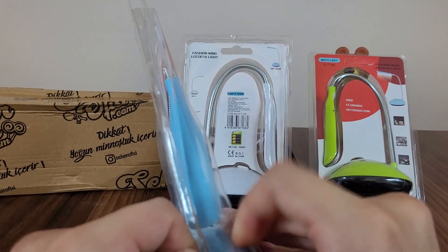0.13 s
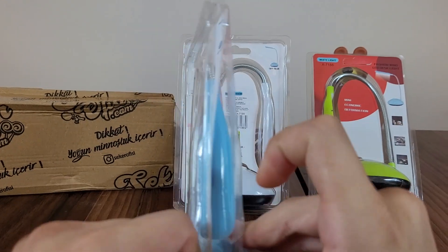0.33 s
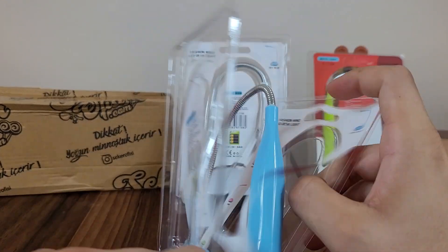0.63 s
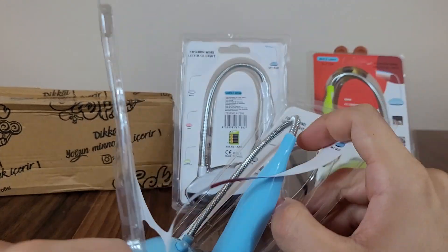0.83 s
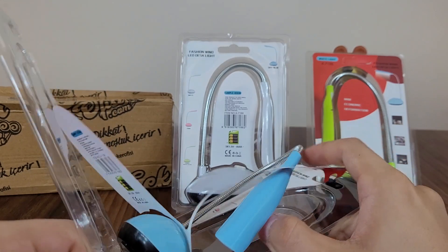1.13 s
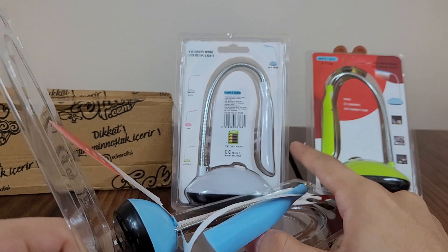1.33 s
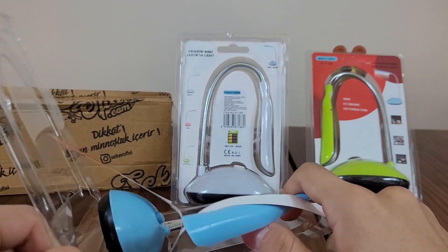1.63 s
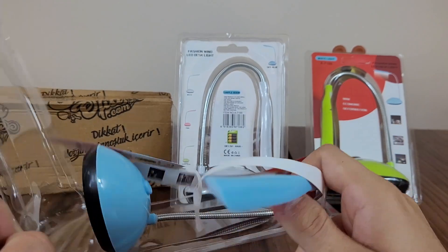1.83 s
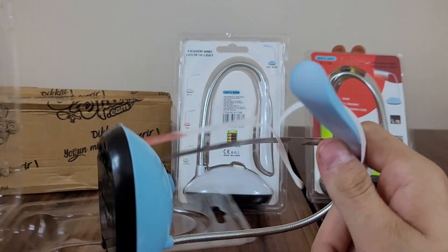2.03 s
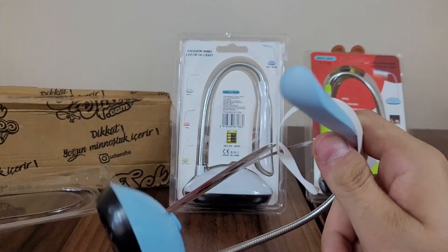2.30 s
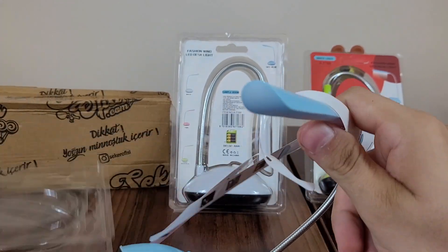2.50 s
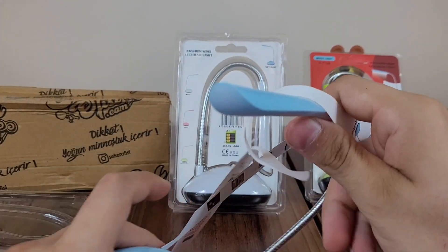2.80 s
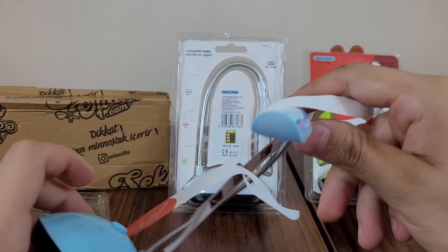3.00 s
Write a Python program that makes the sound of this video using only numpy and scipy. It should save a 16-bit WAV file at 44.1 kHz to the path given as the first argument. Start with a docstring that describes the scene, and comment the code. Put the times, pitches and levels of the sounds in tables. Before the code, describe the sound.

Stiff clear plastic packaging snaps, crackles and rasps as hands pull a lamp out of it

```python
"""Lamp and blister pack

Hands pull a desk lamp out of a stiff clear blister pack, close by in a small room.
The plastic shell snaps as it buckles: sharp fronts, pitched pings and short noise rings.
It rasps and groans in stick-slip where the lamp slides along it, and crinkles under the fingers.
Lamp and pack bump on the wooden table as sums of damped modes; the room answers over a faint floor."""
import sys
import numpy as np
from scipy import signal
from scipy.fft import rfft, irfft, next_fast_len
from scipy.io import wavfile
from scipy.ndimage import uniform_filter1d, map_coordinates

SR = 44100
rng = np.random.default_rng(int(sys.argv[2]) if len(sys.argv) > 2 else 0)


def int16_out(signal):
    """Quantize to a 16-bit WAV file."""
    q = np.round(np.clip(np.atleast_2d(signal).T, -1, 1) * 32767)
    wavfile.write(sys.argv[1], SR, q.astype(np.int16))


N = 138915


def amp(db):
    """Decibel law: level to amplitude ratio."""
    return 10 ** (np.asarray(db) / 20)


def unit(x):
    """Normalisation to an rms of 1."""
    return x / np.sqrt(np.mean(x ** 2) + 1e-20)


def along(points, hz):
    """Interpolation of (f/Hz, value) points on a logarithmic frequency axis."""
    f, v = np.transpose(points)
    return np.interp(np.log(hz + 1), np.log(f + 1), v)


def add(track, s, x):
    """Superposition: mix x into the track from time s."""
    i = max(0, round(s * SR))
    track[:, i:i + x.shape[-1]] += x[..., :max(0, N - i)]


def filtered(x, response):
    """Linear filtering: the spectrum of x times a complex response of frequency."""
    size = 2 * next_fast_len(x.shape[-1] // 2 + 4096)  # even, with room for the tail
    spectrum = rfft(x, size) * response(np.fft.rfftfreq(size, 1 / SR))
    return irfft(spectrum, size)[..., :x.shape[-1]]


def coloured(x, points, tilt=0):
    """Minimum-phase filtering to a (f/Hz, level/dB) shape, tilted in dB per octave about 2.5 kHz."""
    def response(hz):
        octaves = np.log2(np.maximum(hz, 800) / 2500)  # no further tilt below 800 Hz
        cepstrum = irfft(np.log(amp(along(points, hz) + tilt * octaves)))
        # folding the cepstrum onto positive time makes the filter causal
        half = len(cepstrum) // 2
        cepstrum[1:half] *= 2
        cepstrum[half + 1:] = 0
        return np.exp(rfft(cepstrum))
    return filtered(x, response)


# Coherence of the two channels: f/Hz, left-right correlation
LIKENESS = [(60, 0.72), (350, 0.9), (900, 0.31), (2000, 0.062), (6000, 0.033)]


def noise(size):
    """Partial coherence: white stereo noise, alike in the bass and nearly unrelated in the treble."""
    def mid_and_side(hz):
        angle = np.arccos(np.clip(along(LIKENESS, hz), -1, 1)) / 2
        return np.array([np.cos(angle), np.sin(angle)])
    mid, side = filtered(rng.standard_normal((2, size)), mid_and_side)
    return np.array([mid + side, mid - side])


def burst(t60, size=70):
    """Modal overlap: decaying stereo noise of energy 1, of many close modes but an even spectrum."""
    t = np.arange(SR // 10) / SR
    x, decay = noise(len(t)), amp(-60 * t / t60)
    power = uniform_filter1d(np.abs(rfft(x * decay)) ** 2, size)  # smoothed over bins
    evened = irfft(rfft(x) / np.sqrt(np.abs(power)), len(t))
    return unit(evened * decay) / np.sqrt(len(t))


def shell(x, lowest_hz=400):
    """Radiation efficiency: a thin shell radiates little bass."""
    return filtered(x, lambda f: .8 * (1j * f / (lowest_hz + 1j * f)) ** 2)


CLUMPS_PER_S, CLUMP_DB = 170, 2.5  # pace and spread of the clumping
SLIP_SPREAD_DB = 2  # spread of slip sizes in rasps and finger ticks


def slips(rate, spread_db):
    """Stick-slip: a train of tiny uneven clicks that come in clumps, rms 1."""
    place = np.arange(N) * CLUMPS_PER_S / SR
    clump_db = CLUMP_DB * map_coordinates(rng.standard_normal(N // 20), [place], order=1)
    slipping = rng.random(N) < rate / SR
    spread = spread_db * np.clip(rng.standard_normal(N), -2, 2)
    sizes = slipping * amp(clump_db + spread)
    # each slip's energy dies with a time constant of 1.1 ms
    energy = signal.lfilter([1], [1, -np.exp(-1 / (0.0011 * SR))], sizes ** 2)
    return unit(noise(N) * np.sqrt(energy))


# Spectrum of the background: f/Hz, relative level/dB
FLOOR_SPECTRUM = [(20, -14.5), (65, -5.5), (200, -15), (400, -4.5), (600, -37), (1200, -16), (16000, -29.5)]
FLOOR_DB = -68  # rms level


def background():
    """Stationary random noise: a faint, steady floor."""
    return amp(FLOOR_DB) * unit(coloured(noise(N), FLOOR_SPECTRUM))


# Reverberation time of the room: f/Hz, t60/s
ROOM_DECAY = [(100, 0.59), (300, 0.42), (700, 0.37), (2000, 0.33), (5000, 0.28), (13000, 0.083)]
# Spectrum of the reverberation: f/Hz, level/dB
ROOM_SPECTRUM = [(60, -11), (200, -7.5), (330, -4), (600, -8.5), (1100, -9.5), (2600, -6.5), (6000, -17.5),
                 (14000, -13.5)]


def room(x, delay_s=.009, count=12):
    """Diffuse reverberation: noise tails with exponential decay, crossfaded as the pack is moved about."""
    out, place = np.zeros((2, N)), np.linspace(0, count - 1, N)
    for k in range(count):
        hz, t, cells = signal.stft(noise(SR * 2 // 3), SR, nperseg=256)
        t60 = along(ROOM_DECAY, hz)[:, None]
        even_energy = np.sqrt(2 * np.log(1000) / (t60 * SR))  # whatever the decay time
        tail = signal.istft(cells * amp(-60 * t / t60) * even_energy, SR, nperseg=256)[1]
        near = np.abs(place - k) < 1
        part = x[:, near] * np.cos(np.pi / 2 * (place[near] - k))
        answer = signal.fftconvolve(part, coloured(tail, ROOM_SPECTRUM), axes=1)
        add(out, np.argmax(near) / SR + delay_s, answer)
    return out


# Grip of the fingers: t/s, crinkle relative level/dB, low rubbing relative level/dB
FINGER_GRIP = [(0, -40, -44.5), (.14, -48.5, -39), (.29, -51.5, -46.5), (.41, -76, -52.5), (.45, -42, -45),
               (0.539, -43, -47), (.85, -56, -53.5), (1.0, -50, -58.5), (1.111, -55, -93), (1.17, -75, -72),
               (1.229, -51.5, -65), (1.31, -61.5, -92.5), (1.37, -60, -51.5), (1.49, -53.5, -67),
               (1.59, -57, -75), (1.78, -48, -54.5), (2.136, -47, -50), (2.239, -58, -62), (2.4, -46, -48),
               (2.68, -46.5, -44), (2.84, -61.5, -85), (2.96, -64.5, -59.5), (3.15, -57.5, -102)]
# Spectrum of the crinkling: f/Hz, relative level/dB
CRINKLE_SPECTRUM = [(200, -1), (400, -8.5), (620, -7.5), (1100, 7.5), (2500, -1), (5000, -2.5),
                    (10000, -9.5), (16000, -12)]
# Spectrum of the rubbing fingertips: f/Hz, relative level/dB
RUB_SPECTRUM = [(35, -18.5), (68, 8), (100, -1), (150, -2.5), (220, -2), (340, 0), (560, -10.5),
                (2000, -27.5)]
CRINKLES_PER_S, CRINKLE_SPREAD_DB, RUB_TICKS_PER_S = 1600, 6.5, 130
CRINKLE_DB, RUB_DB = -4.5, -3.5  # added to the grip levels


def handling():
    """Stick-slip friction: fine crinkling and soft low ticks of shifting fingertips follow the grip."""
    s, *levels = np.transpose(FINGER_GRIP)
    crinkle_db, rub_db = [np.interp(np.arange(N) / SR, s, level) for level in levels]
    crinkle = unit(shell(coloured(slips(CRINKLES_PER_S, CRINKLE_SPREAD_DB), CRINKLE_SPECTRUM)))
    rub = unit(coloured(slips(RUB_TICKS_PER_S, SLIP_SPREAD_DB), RUB_SPECTRUM))
    return amp(crinkle_db + CRINKLE_DB) * crinkle + amp(rub_db + RUB_DB) * rub


# The groan: start t/s, length/s, first mean f/Hz, last mean f/Hz, level before shaping/dB
GROAN = (2.11, 0.33, 329, 211, -41)


def squeak(waver=0.037):
    """Friction-driven oscillation: a low wavering groan whose pitch falls as the slide slows."""
    s, length, first_hz, last_hz, db = GROAN
    out, u = np.zeros((2, N)), np.linspace(0, 1, round(length * SR))
    wander = 1 + waver * map_coordinates(rng.standard_normal(20), [10 * u])
    hz = (first_hz + (last_hz - first_hz) * u) * wander
    swell = np.sqrt(np.abs(np.sin(np.pi * u))) * (1 - u / 2)
    add(out, s, amp(db) * swell * np.sin(2 * np.pi * np.cumsum(hz) / SR))
    return out


# Bumps of lamp and pack: t/s, relative level/dB, lamp f/Hz, table ring relative level/dB,
# rattle relative level/dB
BUMPS = [(0.28, -32, 300, -13, -28), (0.442, -21, 297, -7, -2.5), (0.5679, -20.5, 390, -15, -9),
         (.703, -27.5, 350, -6, -6), (1.185, -49, 417, -10, -37), (2.2689, -14, 360, -13.5, -5),
         (2.3886, -17, 335, -11, 1), (2.474, -7.5, 264, 3, 13.5), (2.5717, -17, 300, -6, -7.5),
         (2.604, -17.5, 308, 4, 4), (2.66, -26, 330, -8, -1), (2.698, -13.5, 306, -2, 10.5),
         (2.868, -15.5, 361, -5, 6.5)]
# Modes of the table, varied at each bump: mean f/Hz, mean relative level/dB, t60/s
TABLE_MODES = [(70.5, -25, 0.3), (131.2, -29, 0.28), (180.8, -17.5, .14), (299, -33.5, 0.13),
               (421, -18, 0.1)]
# Spectrum of the loose parts: f/Hz, relative level/dB
RATTLE_SPECTRUM = [(300, -5), (780, 7), (1300, -7), (3200, -34.5)]
KNOCK_ATTACK_S, KNOCK_T60_S, RATTLE_T60_S = 0.00086, 0.027, 0.085
OVERTONE_RATIO, OVERTONE_DB, OVERTONE_T60_S = 1.73, -6, 0.018


def knocks(lowest_hz=75):
    """Modal superposition: damped cycles of the hollow lamp and table modes; loose parts rattle on."""
    out, t = np.zeros((2, N)), np.arange(SR // 2) / SR
    for s, db, hz, table_db, rattle_db in BUMPS:
        lamp = [(hz, 0, KNOCK_T60_S), (hz * OVERTONE_RATIO, OVERTONE_DB, OVERTONE_T60_S)]
        table = [(f * rng.normal(1, 0.019), level + table_db + rng.normal(0, 5.4), t60)
                 for f, level, t60 in TABLE_MODES]
        ring = sum(amp(level - 60 * t / t60) * np.sin(2 * np.pi * f * t)
                   for f, level, t60 in lamp + table)
        add(out, s, -amp(db) * ring * (1 - np.exp(-t / KNOCK_ATTACK_S)))
        add(out, s, amp(rattle_db) * shell(coloured(burst(RATTLE_T60_S), RATTLE_SPECTRUM)))
    return filtered(out, lambda f: (1j * f / (lowest_hz + 1j * f)) ** 2)


# Sliding contacts, and at 0.594 s the sheet fluttering after the big snap: peak t/s, rise/s and fall/s over 10
# dB, relative level/dB, tilt/dB per octave,
SLIDES = [(0.209, 0.0066, 0.0015, -23, 2.5, 1000, -19), (0.441, 0.0073, 0.007, -23, -1.5, 880, -6),
          (0.471, 0.016, 0.0036, -29.5, -1.5, 1000, -13.5), (0.594, 0.012, 0.056, -26, 0.5, 2900, -43.5),
          (0.671, 0.023, 0.009, -36, -0.5, 1400, -21), (0.697, 0.018, 0.01, -37.5, 1.5, 4300, -46.5),
          (1.768, 0.036, 0.026, -35.5, 2.5, 800, -27), (1.925, 0.019, 0.035, -38.5, 3.5, 1100, -27.5),
          (1.979, 0.012, 0.029, -28, -2, 800, -17.5), (2.031, 0.032, 0.0067, -22, 2, 790, -38),
          (2.042, 0.014, 0.0054, -19.5, 2.5, 790, -45), (2.08, 0.026, 0.026, -38.5, 5.5, 1220, -56.5),
          (2.452, 0.0016, 0.013, -35, 8.5, 1000, -15), (2.478, 0.012, 0.03, -17.5, -4.5, 670, -5.5),
          (2.599, 0.0044, 0.0081, -17.5, 1, 2450, -3.5), (2.65, 0.022, 0.045, -29.5, -1.5, 980, -9.5),
          (2.673, 0.0036, 0.012, -26, -0.5, 850, -15), (3.084, 0.029, 0.0079, -47.5, 3, 1000, -56)]
# Spectrum of the rasp: f/Hz, relative level/dB
SCRAPE_SPECTRUM = [(500, -12), (620, -3), (1000, 4), (2750, -0.5), (4000, 0), (6000, -2.5), (11300, -12.5),
                   (16000, -15.5)]
# Spectrum of the thump under scrapes and snaps: f/Hz, relative level/dB
THUMP_SPECTRUM = [(25, -24.5), (65, -14), (110, -4.5), (210, -6.5), (330, 4.5), (480, -6.5), (650, -22),
                  (2000, -59)]
SLIPS_PER_S = 4600
SCRAPE_DB, SCRAPE_THUMP_DB = -1.5, -3  # added to the levels of the slides
SCRAPE_RING_DB, SCRAPE_RING_T60_S = 0, 0.038
HOLLOW_WIDTH_HZ, HOLLOW_DB = 123, 7.5


def scrapes():
    """Stick-slip exciting resonance: rasps swell, let go and ring the sheet and one moulded hollow."""
    out, t = np.zeros((2, N)), np.arange(N) / SR
    rasp = slips(SLIPS_PER_S, SLIP_SPREAD_DB)
    for s, rise, fall, db, tilt, hz, thump_db in SLIDES:
        near = np.abs(t - s) < .2
        u = t[near] - s
        stroke = rasp[:, near] * amp(-10 * np.maximum(-u / rise, u / fall))
        ring = signal.fftconvolve(stroke, burst(SCRAPE_RING_T60_S)[:1], axes=1)[:, :len(u)]
        sheet = shell(coloured(0.64 * stroke + amp(SCRAPE_RING_DB) * ring, SCRAPE_SPECTRUM, tilt))

        def hollow(f):
            damping = 1j * f * HOLLOW_WIDTH_HZ
            return 1 + amp(HOLLOW_DB) * damping / (hz * hz - f * f + damping)

        thump = coloured(stroke, THUMP_SPECTRUM)
        scrape = amp(db + SCRAPE_DB) * filtered(sheet, hollow)
        add(out, t[near][0], scrape + amp(thump_db + SCRAPE_THUMP_DB) * thump)
    return out


# Buckling snaps: t/s, relative level/dB, tilt/dB per octave, buckling facet f/Hz, thump relative level/dB
BUCKLES = [(0.0853, -15.5, -7.5, 1064, -7), (0.1038, -16, 5.5, 880, -16), (0.1194, -11.5, 0, 1070, -1),
           (0.1382, -12, 1.5, 1000, -11.5), (0.2055, 1, 1, 4130, 7), (0.3266, -1.5, -8, 2010, 5),
           (0.4584, 7.5, -2, 1300, 4), (0.475, 2, -2.5, 2820, -0.5), (0.5681, 20.5, -3.5, 1407, 6),
           (0.6717, 2, -1, 2670, 6), (0.6967, -4.5, 3.5, 5920, -21), (0.7385, -9, 0, 1980, -1),
           (0.808, -11.5, -2.5, 1560, -25), (0.9365, 1, -2, 2157, -2.5), (1.3533, -16.5, 2, 3140, -11.5),
           (1.5123, -6.5, -6.5, 790, -1.5), (1.6442, -8, -3, 1524, -37), (1.7159, -10.5, 2.5, 6660, -10),
           (1.7694, -12, -10, 817, 2), (1.8173, 2.5, -4.5, 1050, 6), (1.9226, -2, 1.5, 4370, -30),
           (2.1197, -8, 6, 4920, 2.5), (2.1881, -20.5, 8.5, 7540, -37), (2.2697, -11.5, 3, 750, 8.5),
           (2.3323, -9, 1, 960, 14.5), (2.4787, 4.5, 2, 2970, 20.5), (2.5987, 1, 4, 5100, 4.5),
           (2.9212, -11, 2.5, 4020, -3)]
# Spectrum of a whole snap: f/Hz, relative level/dB
SNAP_SPECTRUM = [(500, -6), (650, -12), (1150, 1), (2000, -1), (3000, 0), (6000, -5.5), (11300, -12.5),
                 (16000, -14.5)]
# Spectrum of the sharp front: f/Hz, relative level/dB
FRONT_SPECTRUM = [(1500, -4.5), (3500, 2.5), (7000, -9), (16000, -11.5)]
SNAP_DB, SNAP_THUMP_DB = 0.5, -1  # added to the levels of the buckles
SPIKE_DB, POP_DB, POP_T60_S, RING_DB, RING_T60_S = -2.5, -3.5, 0.0078, -2, 0.065
# light snaps move a single facet and sound more pitched
PING_DB, PING_DB_PER_DB, PING_T60_S = -13, -0.33, 0.028
LEAD_IN_DB, LEAD_IN_T60_S = -27, 0.014
THUMP_RATTLE_DB, THUMP_T60_S = -2, 0.061


def snaps():
    """Snap-through buckling: brief strain, then a sharp front, a pop, one facet's ping and a short ring."""
    out, t = np.zeros((2, N)), np.arange(SR // 10) / SR
    front = np.array([signal.unit_impulse(len(t), k) for k in (0, 2)])  # right two samples later
    for s, db, tilt, hz, thump_db in BUCKLES:
        ping = unit(np.sin(2 * np.pi * hz * t) * amp(-60 * t / PING_T60_S)) / np.sqrt(len(t))
        hit = amp(SPIKE_DB) * coloured(front, FRONT_SPECTRUM)
        hit = hit + amp(POP_DB) * burst(POP_T60_S)
        hit = hit + amp(PING_DB + PING_DB_PER_DB * db) * ping
        hit = hit + amp(RING_DB) * burst(RING_T60_S)
        strain = amp(LEAD_IN_DB) * burst(LEAD_IN_T60_S)[:, SR // 20::-1]  # reversed, so it grows
        snap = shell(coloured(np.hstack([strain, hit]), SNAP_SPECTRUM, tilt))
        add(out, s - strain.shape[1] / SR, amp(db + SNAP_DB) * snap)
        blow = 0.76 * front + amp(THUMP_RATTLE_DB) * burst(THUMP_T60_S)
        add(out, s, amp(thump_db + SNAP_THUMP_DB) * coloured(blow, THUMP_SPECTRUM))
    return out


KNOCK_ROOM_DB = -1  # level of the bumps into the room


def scene():
    """Superposition of direct sound, reverberation and floor."""
    plastic = snaps() + scrapes() + handling() + squeak()
    bumps = knocks()
    floor = background()
    return plastic + bumps + room(plastic + amp(KNOCK_ROOM_DB) * bumps) + floor


# Level difference of the channels: f/Hz, lift of the left and equal drop of the right/dB
LEFT_LIFT = [(300, -0.32), (3000, 0.3), (8000, 0.24), (14000, 3.6)]
LEFT_LEAD_S = .00005  # left ahead of right
TOP_HZ = 16200  # band limit


def record(dry):
    """Time and level differences: the left microphone is a little nearer and brighter; steep band limit."""
    side = np.array([[1], [-1]])

    def pair(hz):
        lead = np.exp(1j * np.pi * hz * LEFT_LEAD_S * side)
        return amp(along(LEFT_LIFT, hz) * side) * lead

    heard = np.clip(filtered(dry, pair), -1, 1)
    return filtered(heard, lambda hz: 1 / (1 + (hz / TOP_HZ) ** 160))


dry = scene()
out = record(dry)
int16_out(out)
```